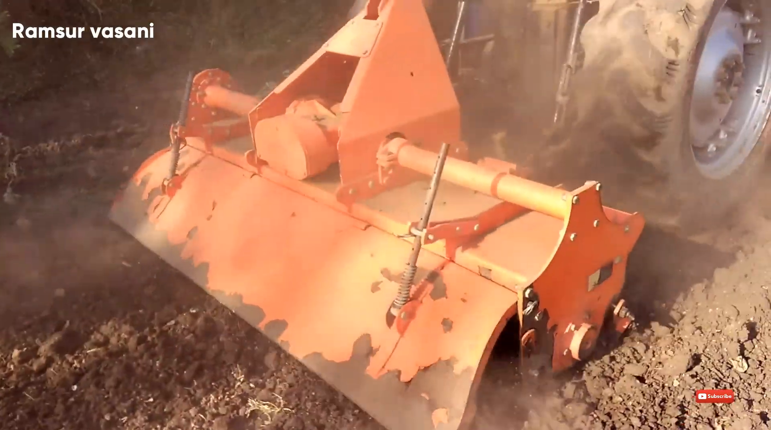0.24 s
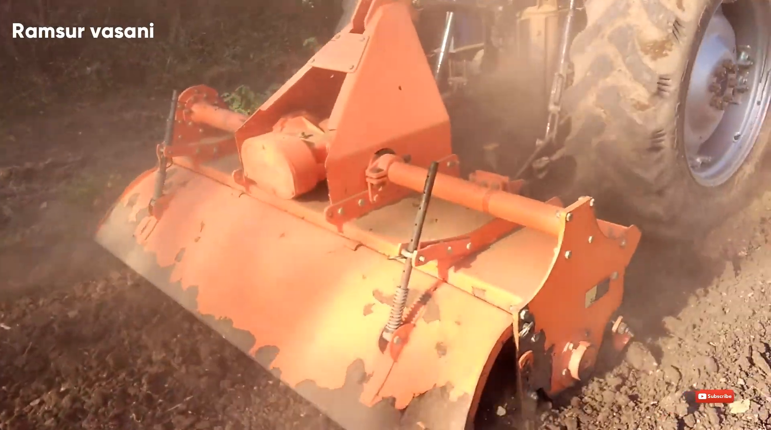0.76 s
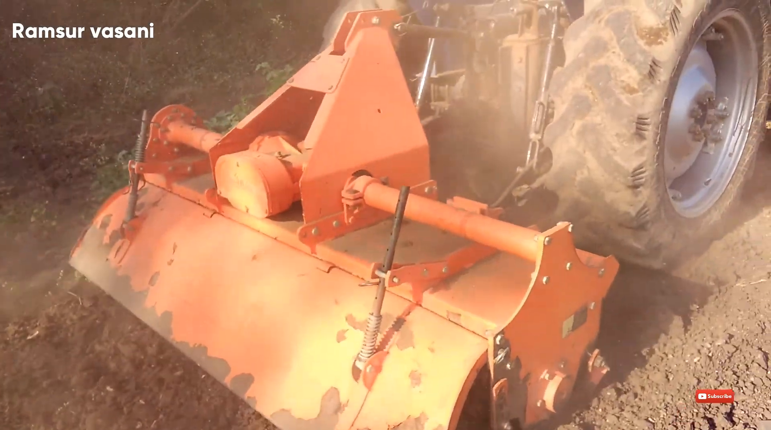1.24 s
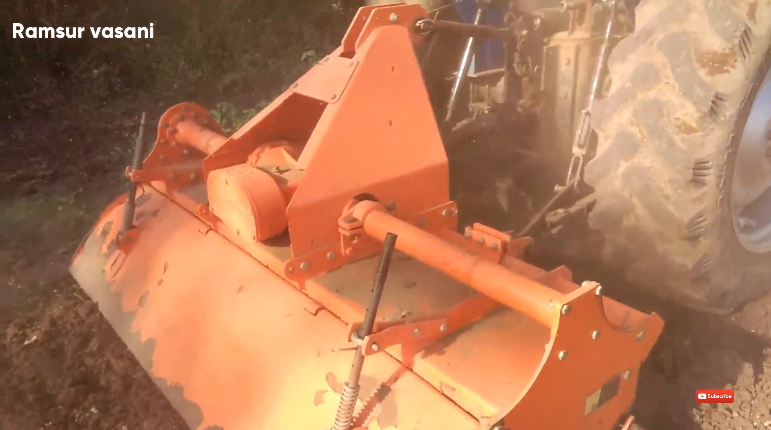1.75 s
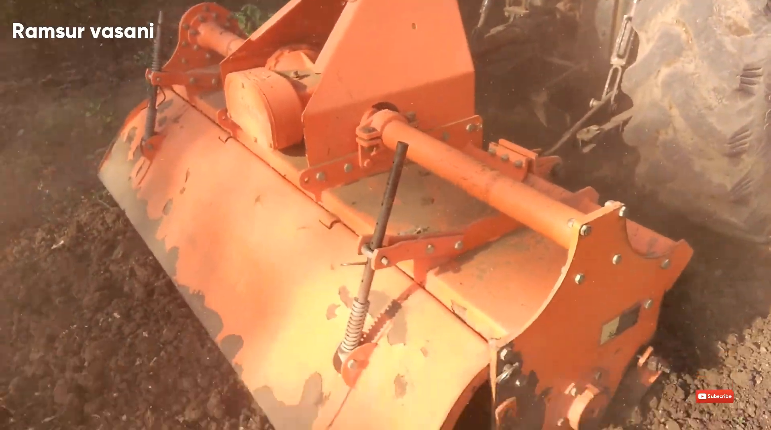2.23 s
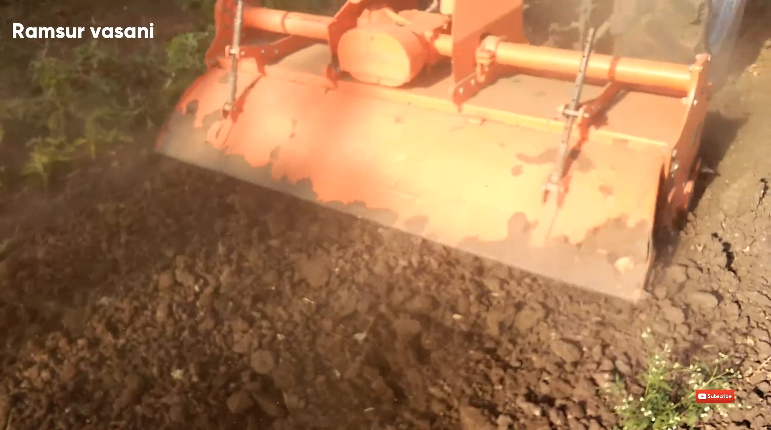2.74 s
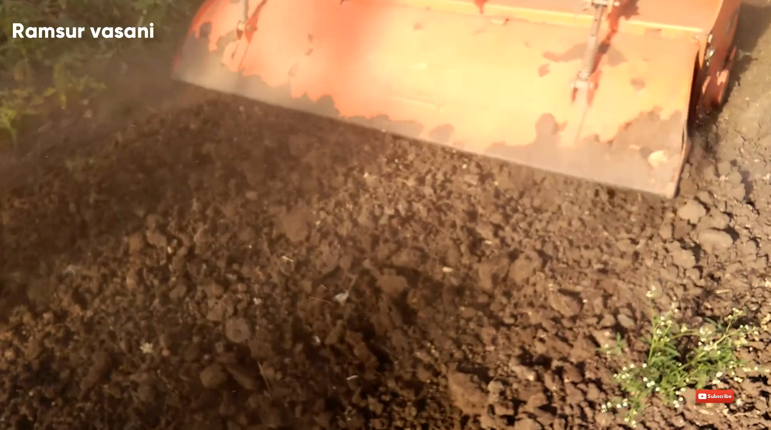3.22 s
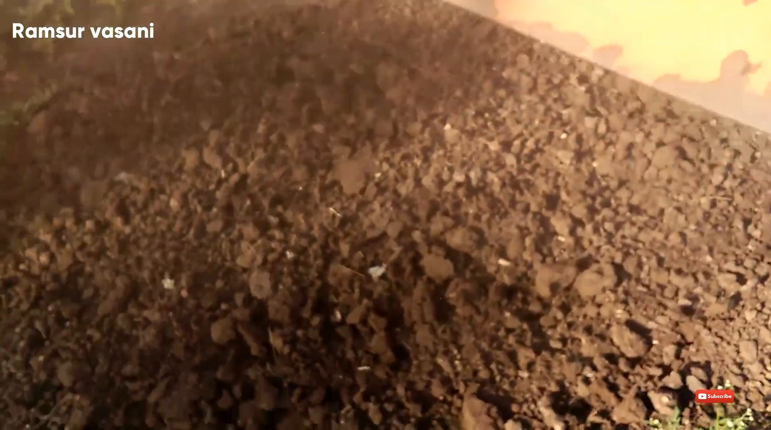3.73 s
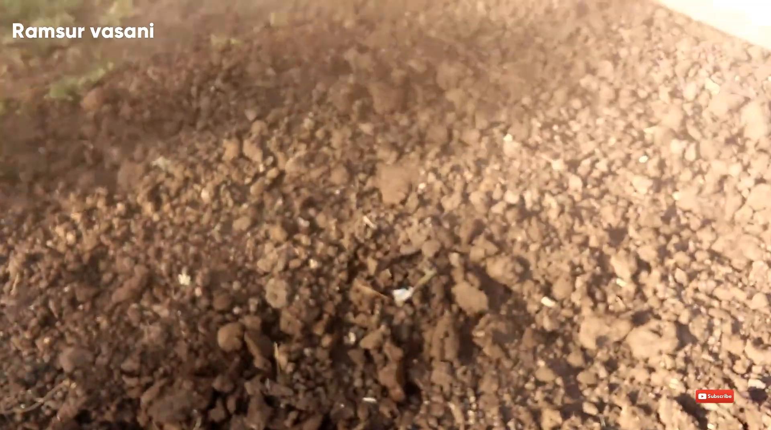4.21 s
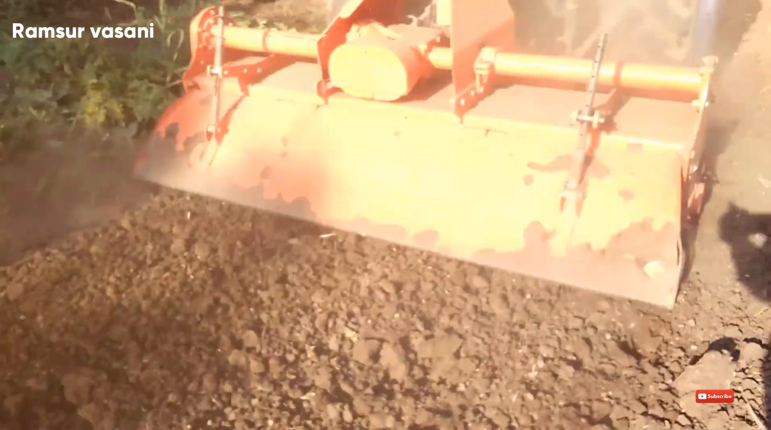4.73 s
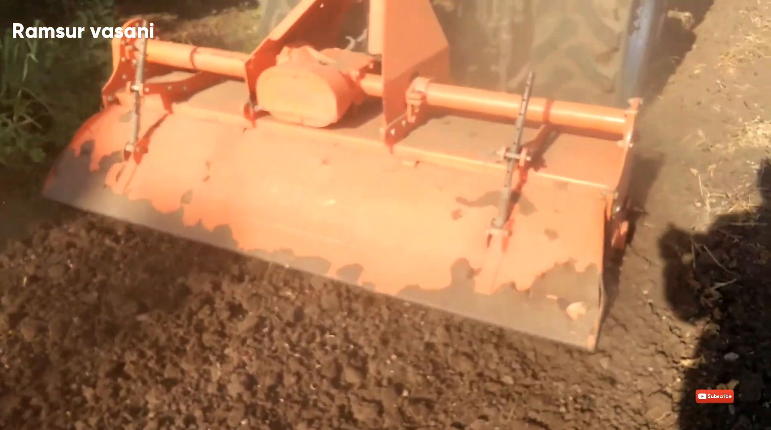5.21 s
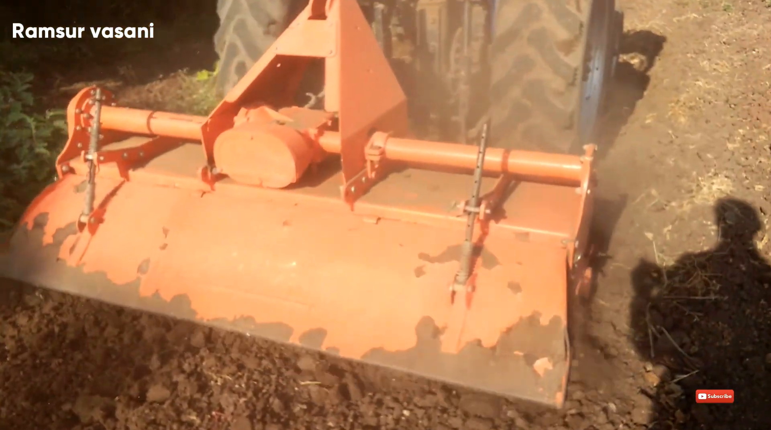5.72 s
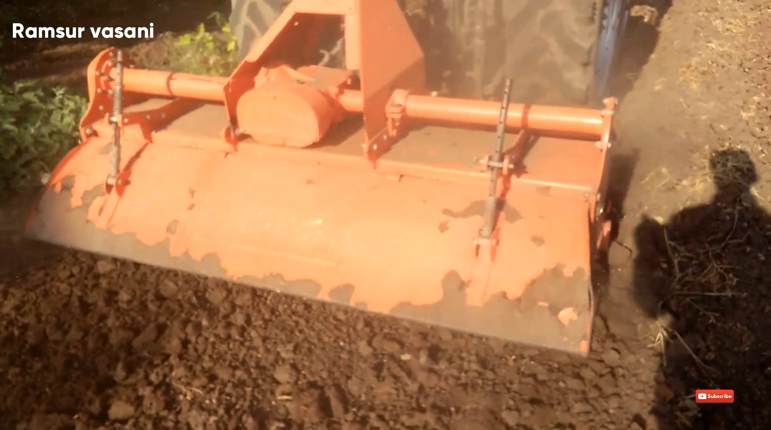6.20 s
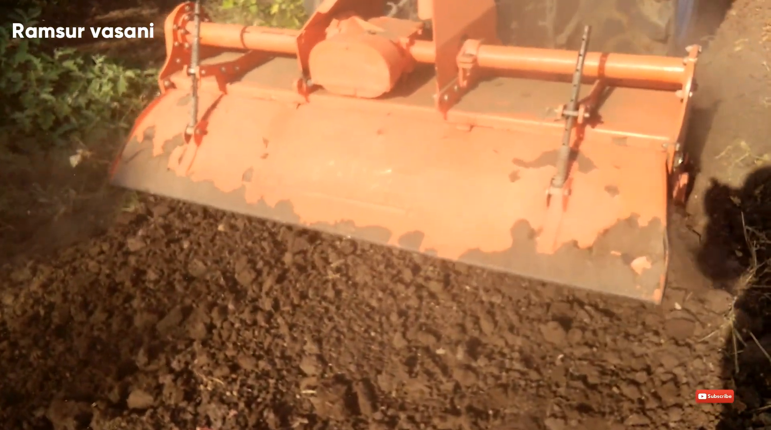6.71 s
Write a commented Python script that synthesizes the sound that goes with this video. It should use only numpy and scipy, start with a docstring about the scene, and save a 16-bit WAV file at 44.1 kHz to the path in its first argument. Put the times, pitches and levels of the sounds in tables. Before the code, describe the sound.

A tractor and rotary tiller work dry soil in an open field, heard closely from behind the steel hood. From 0 to 1.1 seconds the three-cylinder diesel clatters under load amid low earthy booming, rattling crumbs and bright stone cracks, ending in a heavy hood knock. Around 1.2 the soil noise falls away; until 2.5 the blades run free and the engine turns slightly faster, its rough knocking and thin gear whine exposed. At 2.5 the blades bite abruptly with a cluster of clanks and thuds, then complete silence from about 2.6 to 3.1. The sound snaps back with the engine slower and loaded. Thick churning continues to 7 seconds: clods drum and ring on the hood, crumbs hiss in swelling bursts, lumps break on the tilled bed, and stones crack irregularly. Short fluttering metal squeals appear between about 3.6 and 5.8; a strong ringing blow lands at 6.5.

```python
"""In an open field, a three-cylinder diesel tractor drags a rotary tiller through dry soil.
The microphone is just behind its steel hood: clods ring shared hood modes and crumbs hiss as filtered impacts.
Stones crack as decaying grit and a steel part squeals now and then on thin, fluttering tones.
For a moment the blades run free and the engine, a pattern repeated by crank angle, speeds up.
Just after the blades bite again the sound drops out for half a second."""
import sys
import numpy as np
from scipy import signal
from scipy.fft import rfft, irfft, next_fast_len
from scipy.io import wavfile
from scipy.ndimage import map_coordinates

SR = 44100
rng = np.random.default_rng(int(sys.argv[2]) if len(sys.argv) > 2 else 0)


def generate_wav(sig):
    """Save sig (samples, or channels by samples) to the path in sys.argv[1] as 16-bit PCM at SR."""
    pcm = np.round(np.clip(np.atleast_2d(sig).T, -1, 1) * 32767).astype(np.int16)
    wavfile.write(sys.argv[1], SR, pcm)


N = 306495
TIME = np.arange(N) / SR
RING_TIME = TIME[:SR // 8]  # time axis of one blow, an eighth of a second

# loose earth booming under the hood, spectrum: f/Hz, relative level/dB
EARTH_SPECTRUM = [(40, -55.5), (90, -28), (140, -10), (185, -6), (218, 0.5), (250, 0), (290, 4), (340, -4),
                  (430, -4.5), (700, -52)]
# clods on steel, spectrum: f/Hz, relative level/dB
THUD_SPECTRUM = [(80, -36.5), (250, -9), (420, -9.5), (530, -4.5), (680, -1), (810, -2.5), (1020, -8.5),
                 (1350, -10), (1900, -21), (3000, -20.5), (5000, -60)]
# dry crumbs spattering, spectrum: f/Hz, relative level/dB
CRUMB_SPECTRUM = [(700, -35), (1400, 4), (2000, -6), (2800, -0.5), (3800, -5.5), (4900, -2.5),
                  (6600, -10.5), (8700, -17.5), (10800, -14.5), (12800, -22), (15500, -27.5)]


def amp(db):
    """Decibels to gain."""
    return np.exp(np.asarray(db) * np.log(10) / 20)


def unit(x):
    """x at rms 1."""
    return x / np.sqrt(np.mean(x ** 2) + 1e-20)


def curves(rows):
    """One value per sample for each column after the time."""
    s, *cols = np.transpose(rows)
    return [np.interp(TIME, s, c) for c in cols]


def wobble(rate):
    """A smooth random curve, rate knots a second."""
    steps = np.arange(0, N + 64, 64) / SR
    knots = rng.standard_normal(int(N * rate / SR) + 4)
    return np.interp(TIME, steps, map_coordinates(knots, [steps * rate]))


def filtered(x, response):
    """x times a complex response of frequency."""
    m = 2 * next_fast_len(len(x) // 2 + 4096)
    return irfft(rfft(x, m) * response(np.fft.rfftfreq(m, 1 / SR)), m)[:len(x)]


def coloured(x, points):
    """x through a causal (minimum-phase) filter with the gain of the (Hz, dB) points."""
    def response(hz):
        f, db = np.transpose(points)
        gain = amp(np.interp(np.log(hz + 1), np.log(f + 1), db))
        cepstrum = irfft(np.log(gain))
        half = len(cepstrum) // 2
        cepstrum[1:half] *= 2
        cepstrum[half + 1:] = 0
        return np.exp(rfft(cepstrum))
    return filtered(x, response)


def resonate(x, modes):
    """x through parallel (Hz, width Hz, dB) resonances of alternating sign."""
    def response(f):
        total = 0
        for k, (centre, width, db) in enumerate(modes):
            damping = 1j * f * width
            total = total + (-1) ** k * amp(db) * damping / (centre * centre - f * f + damping)
        return total
    return filtered(x, response)


def pelting(rate, spread_db):
    """Impacts at random moments, rate a second on average, of random sign and size."""
    hit = rng.random(N) < rate / SR
    size = amp(spread_db * np.minimum(rng.standard_normal(N), 2))
    return unit(hit * rng.choice([-1, 1], N) * size)


def add(track, s, sound):
    """Mix a sound in at s seconds."""
    start = round(s * SR)
    sound = sound[max(-start, 0):]
    part = track[max(start, 0):][:len(sound)]
    part += sound[:len(part)]


def tractor():
    """The same small impacts return in every engine cycle, and one cylinder knocks harder than the others."""
    # engine speed: t/s, firings per second
    speed_rows = [(0, 31.2), (.55, 31.0), (.9, 31.4), (1.15, 33.9), (1.4, 34.25), (1.75, 33.85),
                  (2.48, 33.7), (2.62, 32), (3.14, 31.05), (3.6, 31.25), (4.7, 31.1), (5.35, 31.5),
                  (5.95, 31.1), (6.55, 31.5), (6.95, 31.6)]
    # engine: t/s, level/dB, diesel knock relative to it/dB
    engine_rows = [(0, -30.5, -29), (.9, -32.5, -10), (1.4, -33.5, -19), (1.7, -33.5, -12),
                   (2.05, -31.5, -13.5), (2.48, -33.5, -9.5), (3.14, -36, -12.5), (6.95, -36, -16)]
    speed, = curves(speed_rows)
    level_db, knock_db = curves(engine_rows)
    cycles = np.cumsum(speed * (1 + .0008 * wobble(10))) / (SR * 3)  # three firings a cycle
    cycles = cycles - np.interp(2.036, TIME, cycles)  # the hardest cylinder fires at this moment
    angle = cycles % 1
    firing = np.exp(-(3 * cycles % 1) / .4)
    valves = np.exp(-(12 * cycles % 1) / .3)
    load = np.clip((33.6 - speed) / 2.1, 0, 1)  # the slower the engine, the higher the load
    clatter = engine_clatter(angle, firing, valves, load)
    knock = diesel_knock(angle, firing, valves)
    return amp(level_db) * (clatter + amp(knock_db) * knock) + engine_tones(cycles, load)


def engine_clatter(angle, firing, valves, load):
    """Impacts fixed to the crank angle, mixed with random ones, shake the block and ring the casing."""
    # engine and gearbox clatter, spectrum: f/Hz, relative level/dB
    block_spectrum = [(53, -52), (90, -24.5), (140, -15), (245, -1.5), (380, -4), (527, -11), (880, -3.5),
                      (1100, -7.5), (1800, -13.5), (2400, -19), (2900, -24), (3750, -22.5), (4200, -30.5),
                      (7200, -33.5), (8600, -40.5), (15500, -52.5)]
    # casing resonances: f/Hz, width/Hz, relative level/dB
    casing_modes = [(254, 65, -8), (903, 49, 0), (1370, 220, 1), (1800, 380, 1.5), (2440, 100, -5),
                    (3600, 500, -2), (7000, 670, -0.5)]
    drive = unit(1.5 + 0.64 * firing + .5 * valves)
    spectrum = amp(2 * rng.standard_normal(size=2049)) * np.exp(2j * np.pi * rng.random(size=2049))
    pattern = unit(irfft(spectrum))  # each impact has its own crank angle
    repeating = pattern[(angle * len(pattern)).astype(int)]
    scatter = 0.92 + 0.48 * load  # random part: running free, added by load

    def rattle():
        impacts = repeating + scatter * rng.standard_normal(N)
        return coloured(drive / np.hypot(1, scatter) * impacts, block_spectrum)

    return amp(-2.6) * unit(rattle()) + amp(-15.5) * unit(resonate(rattle(), casing_modes))


def diesel_knock(angle, firing, valves):
    """Each firing sets off a fading burst of noise; once a cycle a longer one makes it harder."""
    hardest = np.exp(-angle / .21)  # fades with this share of an engine cycle as time constant
    others = 0.94 * firing
    bursts = (hardest + others) * (0.65 + valves) * rng.standard_normal(N)
    return unit(coloured(bursts, [(800, -28.5), (1400, 4.0), (2050, 3), (2250, -5), (2480, 0.5),
                                  (2750, -24.5), (5000, -49.0)]))


def engine_tones(cycles, load):
    """Exhaust and gear tones locked to the engine cycle; load shifts their levels and roughens them."""
    # exhaust and gear tones: multiple of the engine cycle, mean level/dB running free, under load
    tone_rows = [(3.03, -66, -86.5), (6.04, -66.5, -60), (9, -65, -57), (13.03, -57, -58.5),
                 (18.16, -50.5, -64.5), (21, -50.5, -46.5), (21.95, -48.5, -47.5), (26.07, -58, -46),
                 (28.04, -58.5, -43), (32.65, -52, -57), (43.1, -54, -57.5), (55.3, -57.5, -55),
                 (58.8, -62, -49), (65.5, -52, -59.5), (80.6, -45.5, -55.5), (82.1, -47, -56.5),
                 (87.2, -55, -56.5), (124.7, -54, -59.5)]
    smear_rad = 0.35 + 0.65 * load  # phase unsteadiness: running free, added by load
    tones = np.zeros(N)
    for order, free_db, loaded_db in tone_rows:
        level_db = free_db + load * (loaded_db - free_db) + 1.6 * wobble(7.1)
        phase = 2 * np.pi * (order * cycles + rng.random()) + smear_rad * wobble(18)
        tones += np.sqrt(2) * amp(level_db) * np.sin(phase)
    return tones


def soil():
    """Earth booms and clods drum on the hood while dry crumbs spatter it and lumps land behind it."""
    # what reaches the microphone from place to place: t/s, lumps landing on the tilled bed/dB,
    # spray from the hood's open side/dB, drumming of the hood/dB, ring of the side plate/dB,
    # ground rumble/dB (all relative levels)
    place_rows = [(0, -29, -3, -2.5, -4, -20.5), (1.1, -31, -7.5, -4.5, -2, -21),
                  (2.55, -4, -14.5, -0.5, -8, -28), (3.2, -14, -17, -1.5, -23, -16),
                  (3.75, -4.5, -7.5, 1, -27, -14), (4.45, -3.5, -5, 1, -19, -16),
                  (5.15, -9.5, -24, -0.5, -27, -17.5), (5.5, -17, -8.5, 0, -29, -17),
                  (6.95, -9, -27, 0.5, -13, -22.5)]
    earth_gain, clod_gain, crumb_gain = soil_flow()
    bed_db, spray_db, drum_db, plate_db, rumble_db = curves(place_rows)
    lumps = wobble(40)  # the blades throw soil in uneven handfuls
    clods = (amp(drum_db) * hood_drumming(lumps) + amp(bed_db) * landing_lumps()
             + amp(plate_db) * side_plate() + amp(rumble_db) * ground_rumble(lumps))
    grit = crumbs_and_grit(lumps, spray_db)
    return amp(-1.0) * earth_gain * earth_boom(lumps) + clod_gain * clods + crumb_gain * grit


def soil_flow():
    """Gains of earth, clods and crumbs: all follow the flow of soil, and heaps swell them."""
    # soil passing the blades; they lift clear, run free and bite again: t/s, level/dB
    flow_rows = [(0, -26.5), (.6, -29), (.92, -27.5), (1, -34.5), (1.13, -33.5), (1.2, -41), (1.55, -44.5),
                 (2.48, -61), (2.51, -24), (2.57, -28.5), (2.62, -41), (3.14, -31), (3.7, -30.5),
                 (4.15, -32), (4.9, -28), (5.7, -29.5), (6.3, -30.5), (6.95, -31.5)]
    # a heap of soil bursts against the hood: t/s at its height, swell of the crumbs/dB
    heap_rows = [(3.395, 4.5), (3.599, 8), (3.769, 7), (4.02, 7), (4.48, 1.5), (5.2, 2.5), (5.49, 6),
                 (5.6, 2.5), (5.79, 8)]
    rise_s, fall_s = 0.049, 0.052
    flow_db, = curves(flow_rows)
    flow_db = flow_db - 0.15 * wobble(4.8)
    usual_db = np.median(flow_db)
    heap_db = np.zeros(N)
    t = np.arange(-SR // 4, SR // 4) / SR
    for s, db in heap_rows:
        swell = np.exp(-(t / np.where(t < 0, rise_s, fall_s)) ** 2)
        add(heap_db, s + t[0], db * swell)
    change_db = flow_db - usual_db
    clods_db = change_db + 0.57 * heap_db  # clods follow only part of a heap's swell
    earth_db = -7 + 1.25 * clods_db  # dB of earth per dB of clods
    crumbs_db = -9.5 + .95 * change_db + heap_db
    return amp(usual_db + np.array([earth_db, clods_db, crumbs_db]))


def hood_drumming(lumps):
    """Clods hit the steel with dull thuds and set the hood's own modes ringing."""
    thud = unit(coloured(pelting(rate=2500, spread_db=2.0) * amp(1.3 * lumps), THUD_SPECTRUM))
    blows = coloured(pelting(rate=600, spread_db=0.5), THUD_SPECTRUM)
    ringing = drummed(blows, hz=800, octaves=1.9)
    return amp(-1.0) * thud + amp(-4.5) * ringing


def drummed(impacts, hz, octaves):
    """Impacts ring the hood; the spot where they land shifts every third of a second."""
    track, step = np.zeros(N), SR // 3
    for start in range(0, N, step):
        ring = unit(hood_ring(hz, octaves))
        add(track, start / SR, signal.fftconvolve(impacts[start:start + step], ring))
    return unit(track)


def hood_ring(hz, octaves):
    """One blow's ringing; where it lands sets the strengths, and modes near hz speak most."""
    # modes of the sheet steel hood: mean f/Hz, mean relative level/dB, t60/s
    hood_modes = [(223.4, 0.5, 0.22), (308, -2.5, 0.11), (510.4, 0.5, 0.098), (608, 1.5, 0.14),
                  (650, -3.5, 0.23), (684, 1, 0.17), (744, 1.5, .12), (809.6, -1, 0.16), (861, -3.5, 0.31),
                  (910, -7.5, 0.2), (1073, -12, 0.067), (1184, -0.5, 0.042), (1338, -2.5, .1),
                  (1431, 0, 0.11), (1700, -8, 0.056), (1800, 0, 0.07), (2126, -2.5, .1), (2470, -2, 0.13),
                  (2657, -2.5, 0.14), (2873, -0.5, .08), (3214, -2, .13), (3490, -6, 0.12), (3795, -7, .12),
                  (4020, 0, 0.091), (4600, 1, 0.12)]
    mode, db, t60 = np.transpose(hood_modes)[:, :, None]
    # caked soil shifts the modes by this share from blow to blow
    mode = mode * np.exp(0.0076 * rng.standard_normal(mode.shape))
    nearness = np.exp(-(np.log2(mode / hz) / octaves) ** 2)
    strength = nearness * amp(db + 4.0 * rng.standard_normal(mode.shape))
    waves = np.sin(2 * np.pi * (mode * RING_TIME + rng.random(mode.shape)))
    return np.sum(strength * amp(-60 * RING_TIME / t60) * waves, axis=0)


def earth_boom(lumps):
    """Loose earth booms under the hood: uneven impacts through a low, broad filter."""
    return unit(coloured(pelting(rate=700, spread_db=3.5) * amp(2.7 * lumps), EARTH_SPECTRUM))


def crumbs_and_grit(lumps, spray_db):
    """Showers of crumbs spatter, rattle and tinkle on the hood; blades scrape and gravel ticks."""
    # thin ring of blades in grit: f/Hz, width/Hz, relative level/dB
    scrape_modes = [(12650, 70, 1.5), (13290, 70, 5), (13860, 110, 2.5), (14720, 50, -5.5), (15250, 80, -4)]
    # spray from the hood's open side: f/Hz, width/Hz, relative level/dB
    spray_modes = [(6240, 330, 2), (7300, 910, -2)]
    showers = amp(1.5 * lumps + 1.8 * wobble(90))
    spatter = unit(coloured(pelting(rate=2200, spread_db=-1.5) * showers, CRUMB_SPECTRUM))
    spray = unit(resonate(pelting(rate=920, spread_db=1.5) * showers, spray_modes))
    rattle = chips(rate=380, centre_hz=2800, spread=.5, t60=0.02, spread_db=2.5)
    tinkle = drummed(pelting(rate=260, spread_db=1.0), hz=2300, octaves=1.6)
    scrape = unit(resonate(amp(3 * wobble(8)) * rng.standard_normal(N), scrape_modes))
    crunch = dry_crunch(rate=60, t60=.03, spread_db=2.5)
    on_hood = amp(-3.5) * spatter + amp(-3.5) * rattle + amp(-5.5) * tinkle
    loose = amp(-5.5) * crunch + amp(spray_db - 6) * spray
    on_blades = amp(-30) * scrape + amp(-24) * gravel_ticks()
    return on_hood + loose + on_blades


def chips(rate, centre_hz, spread, t60, spread_db):
    """Small stones and hard crumbs, each with a short ring at its own pitch."""
    t = TIME[:SR // 45]
    count = int(rate * N / SR)
    when, pitch, size, life = rng.standard_normal((count, 4)).T
    start = (np.abs(when) * 1000 % 1 * N).astype(int)  # scattered evenly over the whole scene
    hz = np.clip(centre_hz * np.exp(spread * pitch), 900, 14000)
    gain = amp(spread_db * np.minimum(size, 2)) * np.minimum(1, centre_hz / hz)
    decay = amp(-60 * t / (t60 * np.exp(0.72 * life))[:, None])
    rings = gain[:, None] * decay * np.sin(2 * np.pi * hz[:, None] * t)
    places = start[:, None] + np.arange(len(t))
    return unit(np.bincount(places.ravel(), rings.ravel(), N)[:N])


def dry_crunch(rate, t60, spread_db):
    """Small dry clods split one by one, each in a short burst of grit."""
    power = signal.fftconvolve(pelting(rate, spread_db) ** 2, amp(-60 * RING_TIME / t60) ** 2)[:N]
    return unit(coloured(np.sqrt(np.abs(power)) * rng.standard_normal(N), CRUMB_SPECTRUM))


def gravel_ticks():
    """Sharp bits of gravel glance off the blades: sparse, very bright, short bursts."""
    hits = np.abs(pelting(rate=12, spread_db=5.0))
    bursts = signal.fftconvolve(hits, amp(-60 * RING_TIME / 0.03))[:N]  # t60 0.03 s
    band = [(9100, 7000, 0)]
    return unit(resonate(resonate(bursts * rng.standard_normal(N), band), band))


def landing_lumps():
    """Lumps break on the loose soil of the tilled bed: filtered impacts in uneven handfuls."""
    # lumps breaking on loose soil, spectrum: f/Hz, relative level/dB
    bed_spectrum = [(500, -31), (900, 4), (1080, 4), (1550, 0.5), (1800, -1.5), (2050, -12.5), (4000, -42)]
    return unit(coloured(pelting(rate=900, spread_db=1.5) * amp(1.5 * wobble(50)), bed_spectrum))


def side_plate():
    """Impacts ring the narrow resonances of the side plate."""
    # side plate resonances: f/Hz, width/Hz, relative level/dB
    plate_modes = [(580, 70, 1), (750, 48, 3), (886, 50, -0.5), (952, 66, 0), (1352, 110, -7),
                   (1800, 38, -10.5), (2060, 38, -14)]
    return unit(resonate(pelting(rate=2100, spread_db=1.0), plate_modes))


def ground_rumble(lumps):
    """Blades pound the ground: uneven impacts through a very low filter."""
    # blades pounding the ground, spectrum: f/Hz, relative level/dB
    rumble_spectrum = [(30, -33), (60, -13), (90, -1.5), (135, 2.5), (175, -1), (300, -32)]
    return unit(coloured(pelting(rate=410, spread_db=0.5) * amp(2.0 * lumps), rumble_spectrum))


def knocks():
    """A heavy clod rings the hood with one blow as it crumbles against it."""
    # heavy clods against the hood: t/s, level/dB before a cut of 19 dB, ring pitch f/Hz
    knock_rows = [(.036, -14.5, 317), (.111, -18, 670), (.322, -22, 690), (.561, -18, 684),
                  (.736, -19, 750), (.889, -27, 895), (.912, -27, 650), (1.031, -20, 900),
                  (1.108, -9.5, 580), (1.125, -15, 294), (1.132, -16.5, 631), (2.508, -17, 690),
                  (2.535, -17, 562), (2.553, -13, 350), (2.572, -15.5, 620), (2.595, -25, 506),
                  (3.273, -18, 676), (3.304, -16.5, 864), (3.466, -12, 490), (3.543, -12.5, 750),
                  (3.688, -9.5, 690), (3.746, -17, 1180), (3.78, -19, 297), (3.985, -11.5, 800),
                  (4.205, -16.5, 263), (4.225, -16.5, 970), (4.278, -12.5, 800), (4.357, -14, 1010),
                  (4.423, -10.5, 840), (4.469, -19, 867), (4.583, -11.5, 760), (4.645, -16, 290),
                  (4.744, -10.5, 643), (4.79, -14.5, 700), (4.87, -12.5, 700), (4.957, -19, 1010),
                  (5.016, -14.5, 755), (5.07, -17, 1300), (5.311, -18, 1300), (5.446, -13, 616),
                  (5.544, -13, 586), (5.718, -14, 800), (5.771, -16, 692), (5.823, -14, 780),
                  (5.9, -14, 800), (5.98, -15.5, 284), (6.178, -11.5, 714), (6.413, -19, 332),
                  (6.503, -8, 920), (6.534, -21, 800), (6.654, -14, 1400)]
    track, t = np.zeros(N), RING_TIME
    for s, db, hz in knock_rows:
        crumble = rng.standard_normal(len(t)) * amp(-60 * t / 0.091)  # t60 0.091 s
        ring = hood_ring(hz, 0.54) * (1 - np.exp(-t * hz / .4))  # soft onset
        thump = resonate(coloured(crumble, THUD_SPECTRUM), [(hz, 2.3 * hz, 0)])
        boom = amp(-0.5) * (300 / hz) * unit(coloured(crumble, EARTH_SPECTRUM))
        blow = unit(ring) + amp(-2.5) * unit(thump) + boom
        add(track, s, amp(db - 19.0) * unit(blow))
    return track


def stones():
    """A stone cracks with its own pitches, skips once and sheds grit, chatters and rings the hood."""
    # stones against blades and hood: t/s, level/dB before a cut of 22 dB, centre f/Hz, crack t60/s,
    # relative level of the hood ring/dB, ring pitch f/Hz
    stone_rows = [(.11, -23, 3600, .06, -8, 2600), (.217, -29, 4600, .04, -12, 2600),
                  (0.241, -25, 6500, 0.042, -12, 2600), (0.3045, -20.5, 7200, 0.042, -16, 2600),
                  (0.326, -13, 5700, 0.046, -14, 2000), (.355, -30, 2830, .04, -6, 2600),
                  (0.4325, -14, 6000, 0.033, -7, 1700), (0.501, -19, 5970, 0.06, -12, 2300),
                  (0.536, -22.5, 6660, .06, -20, 2600), (0.5655, -23, 6870, .03, -16, 2600),
                  (.5765, -17.5, 6000, 0.073, -10, 2400), (0.769, -14.5, 4400, .09, 11, 1830),
                  (.78, -22, 4000, 0.082, 11, 1900), (0.801, -21, 6050, 0.032, -8, 2100),
                  (0.874, -24, 5030, 0.045, -10, 2600), (0.889, -13, 4420, 0.062, 8, 1680),
                  (0.901, -24, 3450, .09, -2, 1800), (.945, -23, 3000, .06, -6, 2600),
                  (.994, -22, 5000, 0.077, -14, 2600), (1.032, -25.5, 4000, .06, -6, 2000),
                  (1.0956, -15.5, 3900, 0.06, 3, 1800), (1.11, -18.5, 3180, 0.058, 9, 1800),
                  (1.312, -37, 4500, .07, -5, 3000), (2.5085, -12.5, 4570, .08, 9, 1900),
                  (2.537, -21.5, 5160, 0.11, 3, 2100), (2.573, -24.5, 5340, 0.15, 5, 2000),
                  (3.2214, -29, 7000, .03, -20, 2600), (3.3903, -23, 5530, .08, -16, 2600),
                  (3.542, -16.5, 2800, 0.06, 13, 1400), (3.591, -19, 2780, .1, -5, 2800),
                  (3.9624, -17.5, 3900, .06, -5, 2980), (3.985, -19, 2800, .05, 16, 1400),
                  (4.3768, -14, 7000, 0.032, -20, 2800), (4.423, -17, 6450, 0.038, 9, 1400),
                  (4.472, -17.5, 3100, .1, -4, 2900), (4.5087, -21, 5500, 0.065, -18, 2600),
                  (4.585, -19.5, 2800, 0.055, 8, 1400), (4.744, -17.5, 4140, 0.13, 5, 3000),
                  (4.768, -22.5, 4400, 0.087, -4, 2800), (4.895, -17.5, 4000, 0.29, -13, 2600),
                  (5.035, -11.5, 3300, 0.035, 11, 3100), (5.053, -18.5, 11700, 0.027, -25, 2600),
                  (5.07, -21, 3600, .08, 5, 2900), (5.104, -28, 7000, .06, -10, 2600),
                  (5.3121, -12, 3260, 0.096, 7, 1500), (5.327, -28, 8000, .04, -6, 2600),
                  (5.415, -15.5, 9700, 0.02, -27, 2600), (5.581, -17, 3300, 0.078, -6, 2600),
                  (5.604, -18, 4500, .08, -10, 3200), (5.722, -31, 3300, .06, 7, 2600),
                  (5.828, -11, 3900, 0.091, 1, 1700), (5.923, -20, 4770, .06, -16, 2600),
                  (6.183, -28, 3600, .07, -2, 2800), (6.381, -20.5, 3600, 0.082, -8, 2700),
                  (6.5, -14, 4400, .06, 17, 1400), (6.507, -12.5, 3000, .03, 12, 1210),
                  (6.592, -27, 4200, .06, -6, 2900), (6.651, -26.5, 6000, .05, -16, 2600),
                  (6.664, -16.5, 3670, 0.087, 5.5, 3150), (6.827, -21.5, 3970, 0.097, -10, 2600)]
    track = np.zeros(N)
    for s, db, hz, t60, ring_db, ring_hz in stone_rows:
        crack = stone_crack(hz, t60)
        ring = amp(ring_db) * stone_chatter(ring_hz)
        add(track, s, amp(db - 22.0) * unit(crack + ring))
    # the hood muffles the very top
    return filtered(track, lambda hz: 1 / np.sqrt(1 + (hz / 12000) ** 8))


def stone_crack(hz, t60):
    """A brief broad snap, then decaying grit through a band and five random resonances."""
    t = RING_TIME
    skip = t - rng.uniform(0.0016, .009)  # time since the stone skipped
    contact = amp(-60 * t / t60) + 0.8 * amp(-60 * t / 0.016)
    contact += .5 * (skip > 0) * amp(-60 * np.abs(skip) / 0.024)
    grit = contact * rng.standard_normal(len(t))
    pitches = np.minimum(hz * np.exp(0.24 * rng.standard_normal(size=5)), 11500)
    body = unit(resonate(grit, [(pitch, .1 * pitch, 0) for pitch in pitches]))
    band = [(hz, 0.45 * hz, 0)]
    split = amp(-60 * t / 0.024) * rng.standard_normal(len(t))
    snap = unit(resonate(split, [(hz, 1.7 * hz, 0)]))
    core = unit(resonate(resonate(grit, band), band))
    shed = unit(coloured(grit, CRUMB_SPECTRUM))
    return amp(-5.5) * snap + amp(-1.0) * core + amp(-6.0) * body + amp(2.5) * shed


def stone_chatter(ring_hz):
    """A first strike and small, fading rebounds all ring the hood."""
    t = RING_TIME
    rebounds = (rng.random(len(t)) < 150 / SR) * rng.standard_normal(len(t))  # 150 a second
    strikes = (t == 0) + 0.29 * rebounds * amp(-60 * t / 0.07)  # t60 0.07 s
    return unit(signal.fftconvolve(strikes, hood_ring(ring_hz, 0.51))[:len(t)])


def squeal():
    """Rubbing steel catches quickly, flutters on a thin tone at its own pitch, with two faint high modes above."""
    # steel rubbing on steel: t/s at its height, level/dB, rise time constant/s, fall/s, pitch f/Hz
    squeal_rows = [(.008, -39, .02, .018, 6450), (3.625, -40, .014, .05, 2870),
                   (3.636, -34, .011, .05, 3297), (3.792, -30, 0.014, 0.064, 3297),
                   (3.977, -35, .007, .025, 3297), (4.062, -39, .01, .032, 3297),
                   (5.05, -39, .008, .04, 3220), (5.228, -37, .012, .028, 3297),
                   (5.61, -38, .01, 0.055, 3297), (5.8, -45, 0.05, .08, 3297)]
    # high modes that sound with every squeal: f/Hz, relative level/dB
    top_modes = [(13950, -34), (14645, -29)]

    def tone(hz):
        flutter = 0.4 * np.sqrt(hz / 3300) * wobble(50)
        return np.sqrt(2) * amp(1.3 * wobble(45)) * np.sin(2 * np.pi * hz * TIME + flutter)

    track, rubbing = np.zeros(N), np.zeros(N)
    for s, db, rise, fall, hz in squeal_rows:
        distance = np.maximum((s - TIME) / rise, (TIME - s) / fall)
        rub = amp(db) * np.exp(-np.minimum(distance, 20))
        track += rub * tone(hz)
        rubbing += rub
    return track + rubbing * sum(amp(db) * tone(hz) for hz, db in top_modes)


def scene():
    """Tractor and tiller in the open field."""
    return (tractor() + soil() + knocks() + stones() + squeal())[None]


def record(dry):
    """The sound cuts out for half a second; nothing is kept above the band limit."""
    # silent stretch: start t/s, end t/s
    dropout = (2.6175, 3.138)
    top_hz = 15600
    live = (TIME < dropout[0]) | (TIME > dropout[1])
    return filtered(dry[0] * live, lambda hz: np.clip((top_hz - hz) / 200 + .5, 0, 1))[None]


dry = scene()
out = record(dry)
generate_wav(out)
```